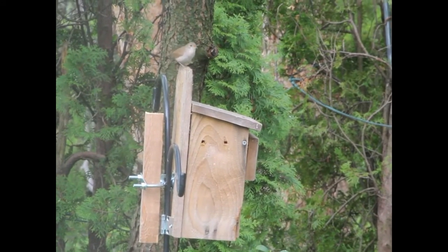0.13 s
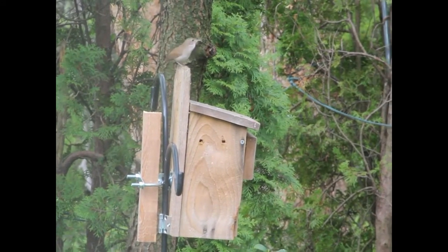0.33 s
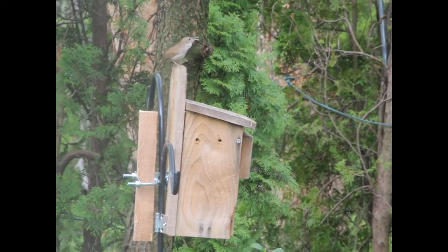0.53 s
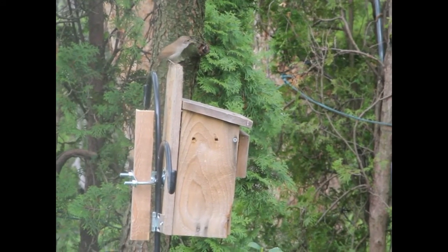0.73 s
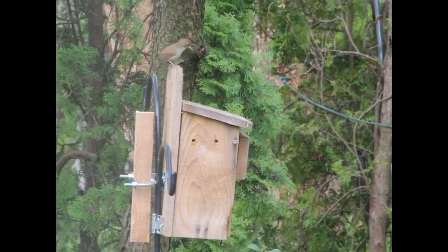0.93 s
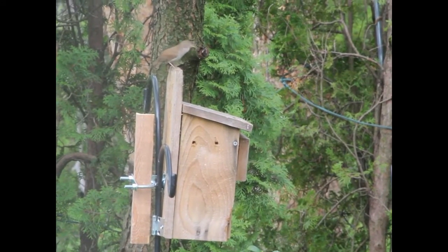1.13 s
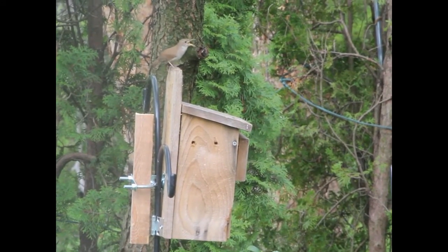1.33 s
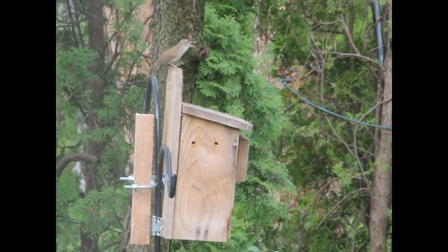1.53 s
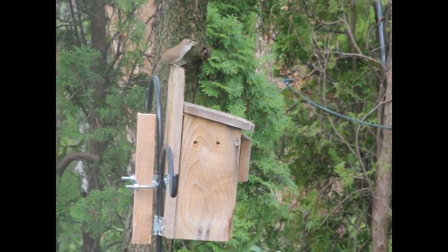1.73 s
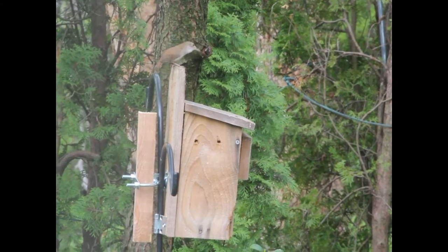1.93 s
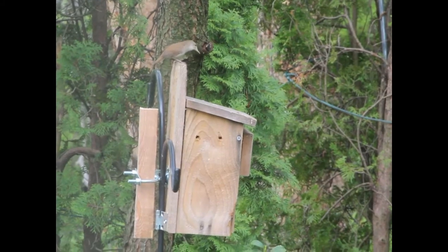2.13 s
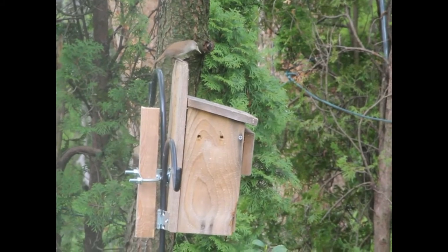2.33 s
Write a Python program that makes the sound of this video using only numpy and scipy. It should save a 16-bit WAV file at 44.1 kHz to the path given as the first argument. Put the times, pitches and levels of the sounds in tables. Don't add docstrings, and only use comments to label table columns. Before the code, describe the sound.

A small bird sings one rapid song, buzzy chatter then bright falling whistles, in an echoing backyard

```python
import sys
import numpy as np
from scipy import signal
from scipy.io import wavfile
from scipy.ndimage import uniform_filter1d

SR = 44100
rng = np.random.default_rng(int(sys.argv[2]) if len(sys.argv) > 2 else 0)


def unload_wav(signal):
    wavfile.write(
        sys.argv[1],
        SR,
        np.round(np.clip(np.atleast_2d(signal).T, -1, 1) * 32767).astype(np.int16),
    )


def gain_from_db(level_db):
    decades = np.asarray(level_db, float) / 20
    return 10 ** decades


N = 110250

EDGE_S = 0.0039
FLUTTER_SHARE = 0.007
# second [dB], third [dB]
RISE_TONES, ROLL_TONES, FALL_TONES = (-29, -60), (-40, -41), (-38, -46)
FALL_BEND = -1.45


def evened(x):
    return x / np.sqrt(np.mean(x ** 2) + 1e-20)


def read(points, hz):
    f, value = np.transpose(points)
    return np.interp(np.log(hz + 1), np.log(f + 1), value)


def add(mix, start_s, sound):
    part = mix[round(start_s * SR):][:len(sound)]
    part += sound[:len(part)]


def slow(t, lo_hz, hi_hz):
    drift = 0
    for hz in np.geomspace(lo_hz, hi_hz, num=20):
        drift = drift + np.sin(2 * np.pi * (hz * t + rng.random())) / np.sqrt(hz)
    return evened(drift)


def edges(t, length_s):
    nearest_s = np.minimum(t, length_s - t)
    return np.sin(np.pi / 2 * np.clip(nearest_s / EDGE_S, 0, 1)) ** 2


def resonate(x, hz, width_hz):
    turn = np.exp(2j * np.pi * np.cumsum(hz) / SR)
    r = np.exp(-np.pi * width_hz / SR)
    return 2 * (turn * signal.lfilter([1 - r], [1, -r], x / turn)).real


def whistle(length_s, from_hz, to_hz, level_db, share, bend, tones):
    t = np.arange(0, length_s, 1 / SR)
    u = np.clip(t / (length_s * share), 0, 1)
    way = u ** bend if bend > 0 else 1 - (1 - u) ** -bend
    flutter = evened(uniform_filter1d(rng.standard_normal(4410), size=60))[:len(t)]
    hz = (from_hz + (to_hz - from_hz) * way) * (1 + FLUTTER_SHARE * flutter)
    phase = 2 * np.pi * np.cumsum(hz) / SR
    tone = np.sin(phase) + gain_from_db(tones[0]) * np.sin(2 * phase)
    tone = tone + gain_from_db(tones[1]) * np.sin(3 * phase) * (hz < SR / 7)
    return np.sqrt(2) * gain_from_db(level_db) * edges(t, length_s) * tone


def whistles(rows, share, bend, tones):
    out = np.zeros(N)
    for start_s, *note in rows:
        add(out, start_s, whistle(*note, share, bend, tones))
    return out


def buzz(length_s, rate_hz, level_db, throat, jitter, sag):
    t = np.arange(0, length_s, 1 / SR)
    u = t / length_s
    wobble = evened(uniform_filter1d(rng.standard_normal(4410), size=30))[:len(t)]
    pulse_hz = rate_hz * (1 - sag * u + jitter * u * wobble)
    phase = 2 * np.pi * np.cumsum(pulse_hz) / SR
    pulses = sum(np.cos(k * phase) for k in range(2, 11))
    sink = 1 + sag * (0.5 - u)
    sound = 0
    for hz, width_hz, db in throat:
        ring = resonate(pulses, hz * sink, width_hz)
        sound = sound + gain_from_db(db) * resonate(ring, hz * sink, 2 * width_hz)
    growth = 0.38 + 0.91 * u ** 2
    return gain_from_db(level_db) * edges(t, length_s) * growth * evened(sound)


def buzzing(rows, throat, jitter, sag):
    out = np.zeros(N)
    for start_s, *note in rows:
        add(out, start_s, buzz(*note, throat, jitter, sag))
    return out


# (frequency [Hz], level [dB])
FLOOR = [(18, -31.5), (55, -2), (220, -3), (900, -15), (1800, -27), (3500, -25), (6000, -39.5),
         (15700, -47)]
FLOOR_DB, PATCH_DB, SWELL_DB = -40.5, 0.69, 0.58


def floor():
    frames, hz = N // 256 + 5, np.fft.rfftfreq(1024, 1 / SR)
    a, b, patches = rng.standard_normal((frames, 513, 3)).T
    patches = uniform_filter1d(uniform_filter1d(patches, size=10, axis=0), size=14, axis=1)
    swell = slow(np.arange(frames) * 256 / SR, 0.3, 4)
    level_db = read(FLOOR, hz)[:, None] + PATCH_DB * evened(patches) + SWELL_DB * swell
    noise = signal.istft((a + 1j * b) * gain_from_db(level_db), nperseg=1024, noverlap=768)[1][:N]
    return gain_from_db(FLOOR_DB) * evened(noise)


# (frequency [Hz], rms level [dB])
WHINES = [(14874, -72), (15714, -81)]
WHINE_WAVER_DB, WHINE_WANDER_HZ = -5, 4


def whines():
    t = np.arange(N) / SR
    out = np.zeros(N)
    for hz, db in WHINES:
        level = np.sqrt(2) * gain_from_db(db + WHINE_WAVER_DB * slow(t, 0.43, 8))
        wander_hz = hz + WHINE_WANDER_HZ * slow(t, 1, 30)
        out += level * np.sin(2 * np.pi * np.cumsum(wander_hz) / SR)
    return out


# (start [s], length [s], from [Hz], to [Hz], level [dB])
FAR = [(.022, .02, 3600, 3533, -51), (0.036, 0.018, 4460, 4190, -52.5), (0.069, 0.027, 3905, 3465, -49.5),
       (2.286, 0.013, 3700, 3430, -46.5), (2.399, 0.0045, 3660, 3570, -37),
       (2.428, 0.0068, 3510, 3530, -44.5)]


def far_birds():
    return whistles(FAR, 1, FALL_BEND, FALL_TONES)


# (start [s], length [s], pulse rate [Hz], level [dB])
BUZZES = [(0.107, 0.037, 1050, -39), (0.193, 0.0277, 1023, -35.5), (0.351, 0.033, 1055, -35)]
# (frequency [Hz], width [Hz], level [dB])
BUZZ_THROAT = [(3150, 420, -6.5), (4500, 630, -6.5), (6340, 480, 1.5), (6980, 1050, -4),
               (9000, 1000, -20.5)]


def buzzes():
    return buzzing(BUZZES, BUZZ_THROAT, jitter=0.2, sag=0.06)


# (start [s], length [s], pulse rate [Hz], level [dB])
CHATTER = [(0.256, 0.028, 477.7, -39), (0.418, .025, 505.5, -37), (0.501, 0.054, 518.4, -37.5),
           (.645, 0.018, 498, -34), (0.699, 0.018, 503, -33)]
# (frequency [Hz], width [Hz], level [dB])
CHATTER_THROAT = [(2150, 140, -4), (3060, 700, 6), (3750, 320, -14)]


def chatter():
    return buzzing(CHATTER, CHATTER_THROAT, jitter=0.123, sag=0.1016)


# (start [s], length [s], from [Hz], to [Hz], level [dB])
RISES = [(.746, .019, 3560, 6244, -28), (1.034, 0.03, 5840, 7830, -32), (1.16, 0.026, 5700, 7466, -28.5)]


def rises():
    return whistles(RISES, 0.533, -1.3, RISE_TONES)


# (start [s], length [s], from [Hz], to [Hz], level [dB])
FALLS = [(.81, 0.025, 4590, 3750, -28), (.866, .022, 3150, 2490, -35.5), (.91, 0.033, 8290, 6630, -36.5),
         (.966, 0.029, 5650, 4500, -26.5), (1.092, 0.025, 6180, 4200, -26),
         (1.22, 0.037, 5750, 4100, -28.5), (1.27, 0.028, 4400, 2900, -27.5),
         (1.382, 0.032, 4550, 2880, -27), (1.492, 0.023, 4500, 2820, -26.5), (1.602, 0.02, 4440, 2900, -25),
         (1.716, 0.031, 4700, 2970, -29), (1.846, 0.029, 4750, 2840, -25), (1.97, 0.036, 4710, 2882, -26.5),
         (2.1, .034, 4800, 2887, -27)]
EARLY_FALLS, EARLY_BEND = 6, -1.7


def falls():
    early = whistles(FALLS[:EARLY_FALLS], 1, EARLY_BEND, FALL_TONES)
    return early + whistles(FALLS[EARLY_FALLS:], 1, FALL_BEND, FALL_TONES)


# (start [s], length [s], from [Hz], to [Hz], level [dB])
HOOKS = [(0.831, 0.018, 4080, 3360, -35), (1.755, 0.019, 3840, 3020, -30.5),
         (1.883, 0.023, 3930, 2970, -32.5), (2.004, 0.021, 3833, 2990, -27.5),
         (2.133, .018, 3920, 2956, -28)]


def hooks():
    return whistles(HOOKS, 1, FALL_BEND, FALL_TONES)


# (start [s], length [s], from [Hz], to [Hz], level [dB])
ROLLS = [(1.316, 0.046, 3830, 5660, -25), (1.428, 0.045, 3984, 5680, -25.5),
         (1.54, .042, 3875, 5610, -25.5), (1.65, 0.048, 3896, 5280, -26)]


def rolls():
    return whistles(ROLLS, 0.83, 1.9, ROLL_TONES)


# (start [s], length [s], from [Hz], to [Hz], level [dB])
PIPS = [(1.762, 0.0297, 2813, 2460, -34.5), (1.908, 0.0243, 2050, 2380, -29.5),
        (2.044, 0.015, 2220, 2420, -35), (2.158, 0.039, 2160, 2425, -39.5)]


def pips():
    return whistles(PIPS, 0.6, -1.5, FALL_TONES)


# (delay [s], level against direct sound [dB])
ECHOES = [(.019, 8), (.009, -8), (.024, 0), (.038, -5), (.058, -8)]
# (frequency [Hz], t60 [s])
YARD = [(2000, 0.23), (3200, 0.4), (5000, 0.48), (8000, 0.41), (15000, 0.067)]
YARD_DB, BUILD_S, DIRECT_DB, SMEAR_S = -3, 0.008, -10, 0.0015
DULL_HZ = 8500


def yard(x):
    taps = np.zeros(SR)
    at = np.arange(40, SR - 12, 12) + rng.integers(0, 12, (SR - 41) // 12)
    taps[at] = rng.choice([-1., 1.], at.shape)
    hz, t, z = signal.stft(taps, SR, nperseg=256)
    decay = gain_from_db(-60 * t / read(YARD, hz)[:, None])
    tail = signal.istft(z * decay, SR, nperseg=256)[1][:SR]
    tail = tail * (1 - np.exp(-np.arange(SR) / SR / BUILD_S))
    path = gain_from_db(YARD_DB) * tail / np.linalg.norm(tail)
    for delay_s, db in ECHOES:
        burst = rng.standard_normal(300) * np.exp(-np.arange(300) / SR / SMEAR_S)
        add(path, delay_s, gain_from_db(DIRECT_DB + db) * burst / np.linalg.norm(burst))
    path = signal.lfilter(*signal.butter(3, DULL_HZ, fs=SR), path)
    return gain_from_db(DIRECT_DB) * x + signal.fftconvolve(x, path)[:N]


def scene():
    song = buzzes() + chatter() + rises() + falls() + hooks() + rolls() + pips()
    return (floor() + whines() + yard(far_birds() + song))[None]


MASK_BELOW_DB, MASK_DB_PER_OCTAVE, MASK_FROM_HZ = 17, 43, 6500


def masked(x):
    hz, _, z = signal.stft(x, SR, window="cosine", nperseg=2048, noverlap=1024)
    band_power = abs(z[:1024].reshape(64, 16, -1) ** 2).mean(1)
    band_db = 10 * np.log10(band_power + 1e-16)
    slope_db = MASK_DB_PER_OCTAVE * np.log2(hz[8::16, None][:64])
    spread_db = uniform_filter1d(band_db, size=3, axis=1) + slope_db
    mask_db = np.maximum.accumulate(spread_db, axis=0) - slope_db - MASK_BELOW_DB
    keep = np.clip((band_db - mask_db) / 2 + 0.5, 0, 1)
    keep = np.append(np.repeat(keep, 16, axis=0), keep[-1:], axis=0)
    z = z * np.where(hz[:, None] > MASK_FROM_HZ, keep, 1)
    return signal.istft(z, SR, window="cosine", nperseg=2048, noverlap=1024)[1][:N]


def band_limit(x):
    return signal.sosfilt(signal.butter(12, 16760, fs=SR, output="sos"), x)


def record(dry):
    mix = masked(dry[0])[None]
    return band_limit(mix)


dry = scene()
out = record(dry)
unload_wav(out)
```